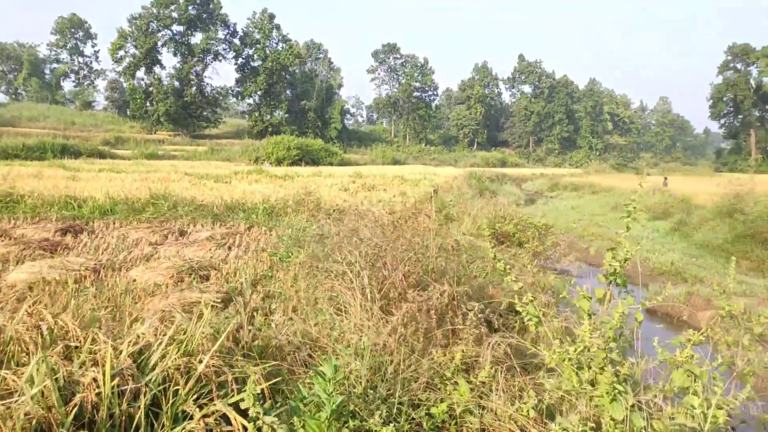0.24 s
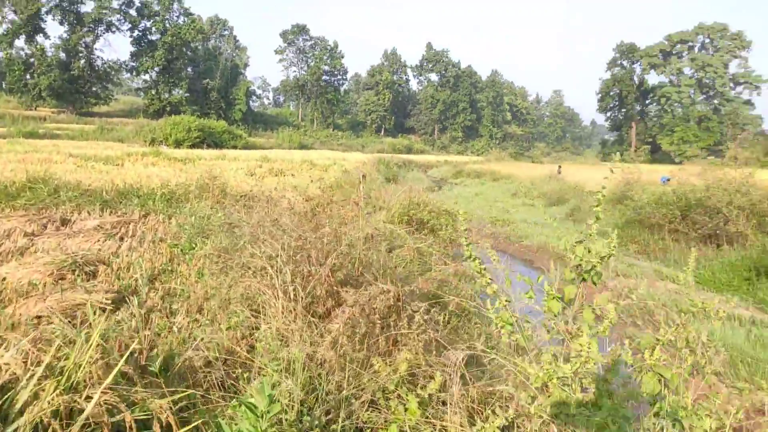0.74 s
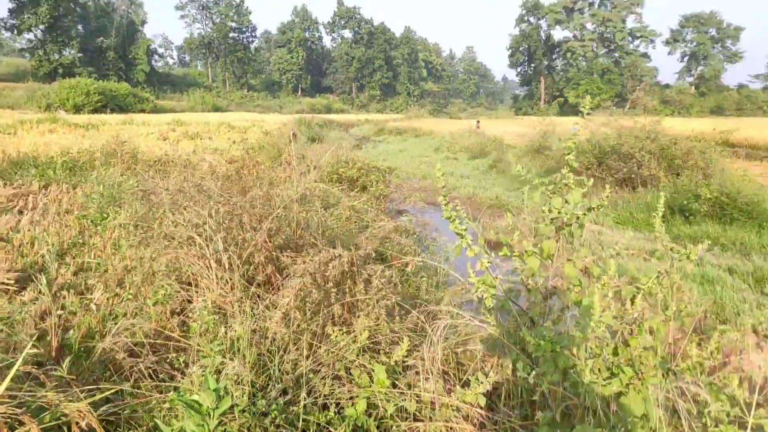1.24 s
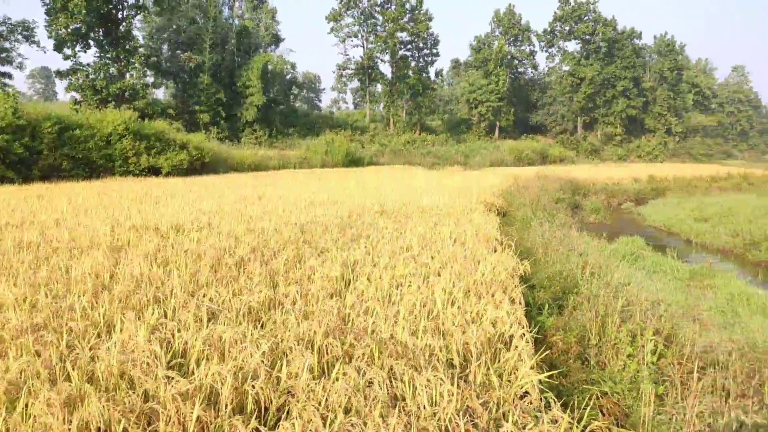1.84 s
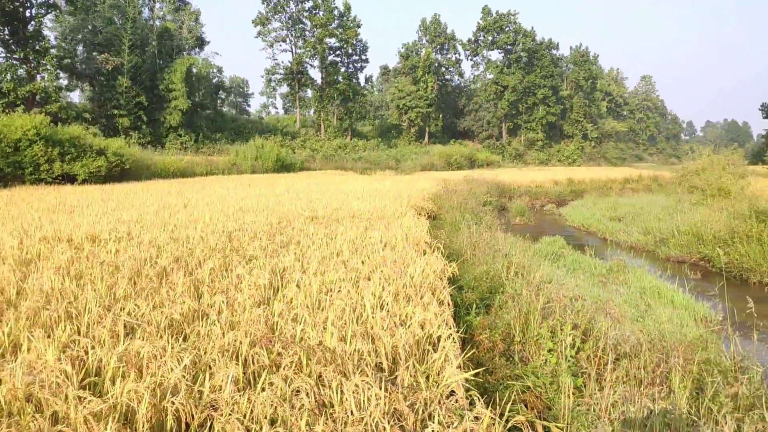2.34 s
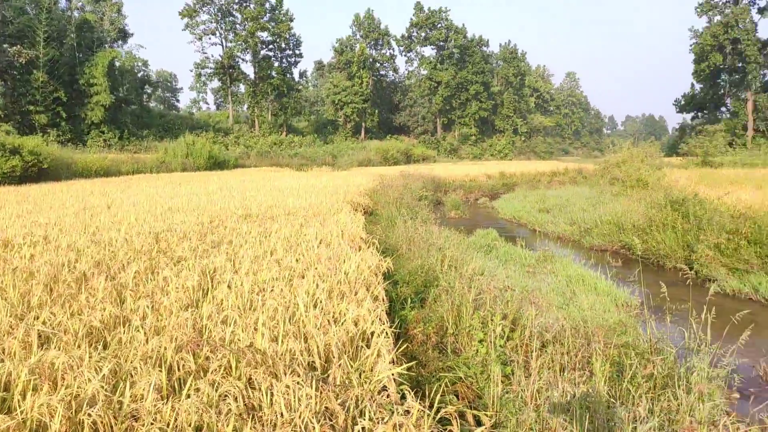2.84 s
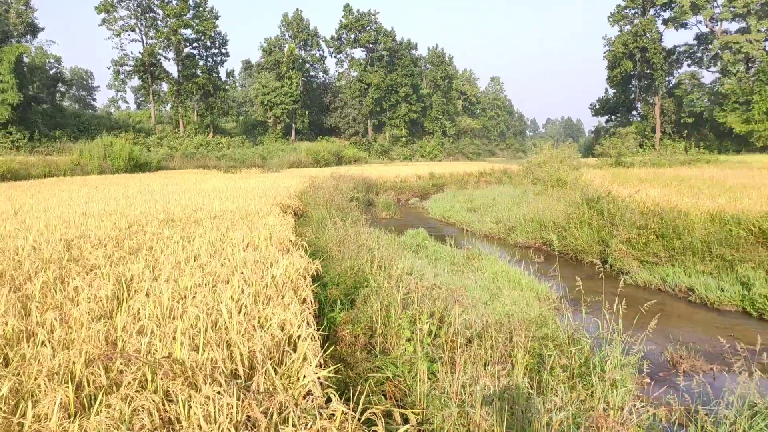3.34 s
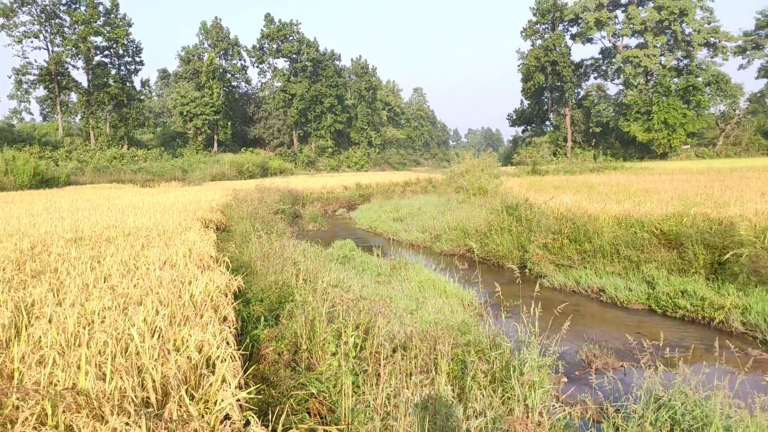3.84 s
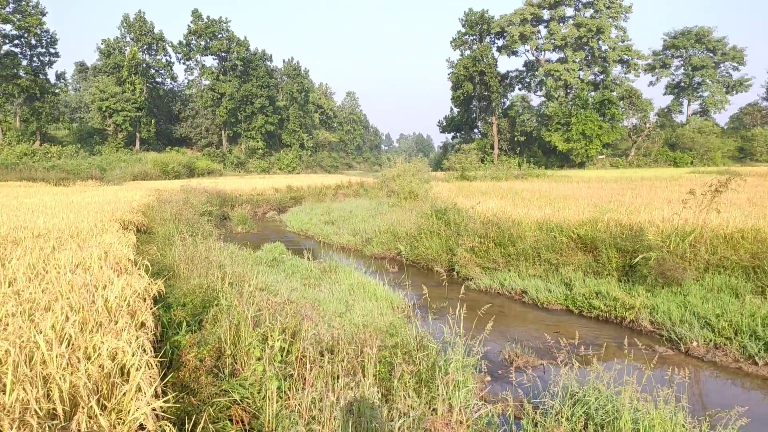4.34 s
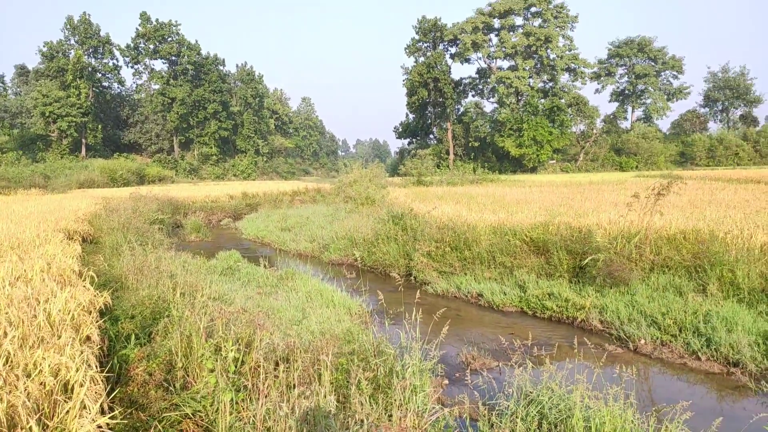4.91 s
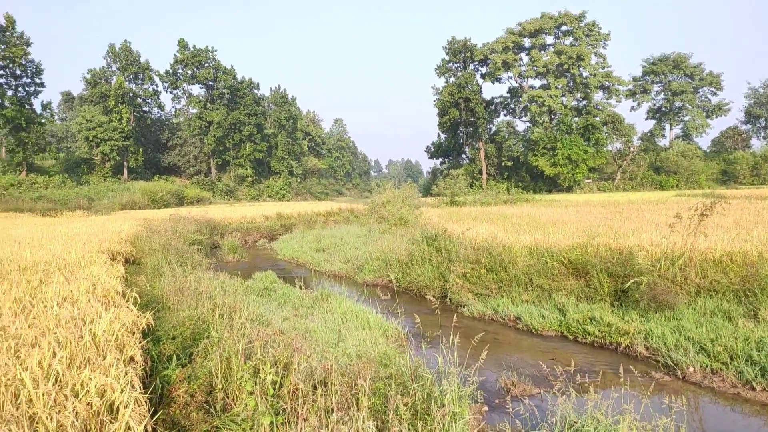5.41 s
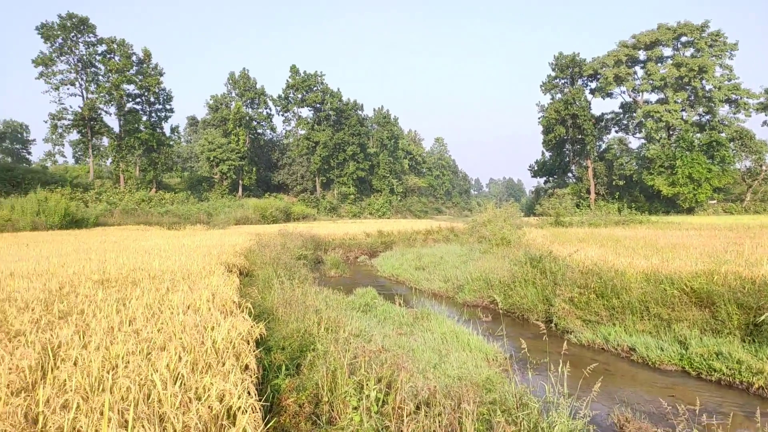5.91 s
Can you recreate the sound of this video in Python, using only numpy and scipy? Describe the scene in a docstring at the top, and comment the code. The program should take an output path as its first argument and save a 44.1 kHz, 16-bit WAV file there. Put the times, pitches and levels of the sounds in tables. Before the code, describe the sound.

From 0 to 1.4 seconds, someone wades through dry grass close to the microphone: crisp, dense rustles surge around 0.1 to 0.25 and 0.5 to 0.65, with a softer one near 1.2. Stems snap around 0.45 to 0.53; stalks knock the left side with damped thumps, thickening after 1.1 and strongest at 1.32. Fluttering insects shimmer above. At 1.4 everything cuts to silence, returning from 1.48 and full by 1.74, without wading. Quiet open air and low rumble remain under steady high insects. Birds trill in rapid short phrases from 1.7 to the end, clearest near 2.5 and 6.0, with distant ones blurred behind. Soft dove coos come at 1.75, 2.25 and 2.7. On the left, rising calls break upward at 2.3, 3.3 after a brief rasp, 4.4, 5.15 and 6.1, with whistles near 4.1 and 5.8. Tiny dry snaps dot 3.4 and 5.1 to 5.5.

```python
"""You hear someone wading through dry grass in rice fields, until all sound drops out and fades back in without the wading.
Grass is a crackle of tiny clicks; stalks knocking on the microphone are damped thumps and taps; stems snap in noise bursts.
Insects are pulsed or fluttering noise. Birds that trill, birds that call upward and a cooing dove are gliding tones,
with one pulsed noise rasp that runs into a rising call.
Below lie shaped noise for open air and rumble, and a faint wavering drone that sinks in pitch."""
import sys
import numpy as np
from scipy import signal
from scipy.fft import rfft, irfft, next_fast_len
from scipy.io import wavfile
from scipy.ndimage import map_coordinates

SR = 44100
rng = np.random.default_rng(int(sys.argv[2]) if len(sys.argv) > 2 else 0)


def unload_audio(sound):
    """Save the sound as a 16-bit wav file, at the path given as the first command line argument."""
    columns = np.transpose(np.atleast_2d(sound))
    # keep every value between -1 and 1, then stretch to whole-number steps
    steps = np.round(np.clip(columns, -1, 1) * 32767)
    wavfile.write(sys.argv[1], SR, steps.astype(np.int16))


N = 272097
TIME = np.arange(N) / SR  # seconds
CHIP_PERIOD_S = .052  # from one chip of a trill to the next

# the dropout and return of the sound: (time [s], gain)
DROPOUT = [(1.399, 1), (1.402, 0), (1.482, 0), (1.5, .11), (1.6, .45), (1.74, 1)]


def undb(db):
    """Decibels to gain."""
    return 10 ** (np.asarray(db) / 20)


def unit(x):
    """Scale to an average strength (rms) of 1."""
    return x / np.sqrt(np.mean(x ** 2) + 1e-30)


def curves(rows):
    """Join the points of each table column by straight lines in time."""
    s, *columns = np.transpose(rows)
    return [np.interp(TIME, s, c) for c in columns]


def colour(x, points):
    """Filter by a spectrum of (Hz, dB) points, falling 24 dB per octave outside them; rms 1."""
    hz, db = np.transpose(points)
    size = next_fast_len(N)
    f = np.maximum(np.fft.rfftfreq(size, 1 / SR), 1)
    below_db = 24 * np.minimum(np.log2(f / hz[0]), 0)
    above_db = 24 * np.minimum(np.log2(hz[-1] / f), 0)
    gain = undb(np.interp(np.log(f), np.log(hz), db) + below_db + above_db)
    return unit(irfft(rfft(x, size) * gain, size)[..., :N])


def resonate(x, hz, width_hz):
    """Ring at one resonance, with gain 1 at its centre."""
    centre_hz = min(hz, SR / 2 - 1000)
    sharpness = hz / min(width_hz, SR / 3)
    return signal.lfilter(*signal.iirpeak(centre_hz, sharpness, SR), x)


def walk(rate):
    """Wander smoothly at random, changing about rate times a second; spread near 1."""
    steps = np.arange(int(N / SR * rate) + 2)
    return map_coordinates(rng.standard_normal(len(steps)), [TIME * rate], mode="nearest")


def pan(db):
    """Gains of left and right for a level difference; above 0 the left is louder."""
    return undb(np.array([np.atleast_1d(db), -np.atleast_1d(db)]) / 2)


def spread(pair, likeness):
    """Blend two unrelated signals into a left and right that are partly alike."""
    c = np.clip(likeness, -1, 1)
    shared = np.sqrt(1 + c) * pair[0]
    opposed = np.sqrt(1 - c) * pair[1] * np.array([[1], [-1]])
    return (shared + opposed) / np.sqrt(2)


def noise():
    """Unrelated white noise for left and right."""
    return rng.standard_normal((2, N))


def add(track, s, sound):
    """Mix a short sound into a track at time s."""
    start = max(int(s * SR), 0)
    part = sound[:max(N - start, 0)]
    track[start:start + len(part)] += part


def swell(start, end, rise_s, fall_s):
    """An envelope that grows until start, holds until end and dies away."""
    return np.exp(np.minimum(TIME - start, 0) / rise_s - np.maximum(TIME - end, 0) / fall_s)


def together(gains):
    """Joint strength of unrelated sounds: their powers add."""
    return np.sqrt(sum(g ** 2 for g in gains))


def whistles(notes):
    """Pure tones, each gliding along its (s, Hz, dB) points."""
    out = np.zeros(N)
    for note in notes:
        s, hz, db = np.transpose(note)
        t = np.arange(s[0], max(s[-1], s[0] + .01), 1 / SR)
        # short ramps at both ends avoid clicks
        edges = np.clip(np.minimum(t - t[0], t[-1] - t) / 0.0019, 0, 1)
        phase = 2 * np.pi * np.cumsum(np.interp(t, s, hz)) / SR
        add(out, s[0], np.sqrt(2) * edges * undb(np.interp(t, s, db)) * np.sin(phase))
    return out


def placed(shape, s, pitch, db):
    """A call shape moved to its time, pitch and level."""
    return np.array(shape) * [1, pitch, 1] + [s, 0, db]


def outdoors(x, pan_db, near_db, far_db, t60, lag_s=0):
    """Direct sound (left lag_s later), quick scatter from the crop, and a thin tail from the tree line."""
    t = np.arange(SR) / SR
    near = rng.standard_normal((2, SR)) * undb(-60 * t / .04)
    far = rng.standard_normal((2, SR)) * undb(-60 * t / t60) * np.clip(t / 0.022, 0, 1)
    response = (undb(near_db) * unit(near) + undb(far_db) * unit(far)) / np.sqrt(SR)
    direct = np.array([np.interp(TIME - lag_s, TIME, x), x])
    echoes = signal.fftconvolve(x[None], response, axes=1)[:, :N]
    total = np.sqrt(1 + undb(near_db) ** 2 + undb(far_db) ** 2)
    return pan(pan_db) * (direct + echoes) / total


def crackle(rate, scatter_db):
    """Countless tiny clicks of uneven size, left and right; rate is clicks per second."""
    sizes = undb(scatter_db * np.minimum(rng.exponential(size=(2, N)), 6))
    return unit(noise() * sizes * (rng.random((2, N)) < rate / SR))


def grass():
    """Each push makes dry blades scrape past each other in a dense hiss; thicker stems crunch lower down."""
    # spectra of the two layers: (frequency [Hz], level [dB per Hz])
    hiss_spectrum = [(2500, -16), (4500, -10), (6500, -12.5), (8800, -4.5), (10300, -3), (12500, -5),
                     (15500, -7.5)]
    crunch_spectrum = [(60, 11), (200, -6), (450, -4), (900, -3.5), (1800, -2.5), (3200, -1), (4500, -2),
                       (7000, -4), (12000, -26)]
    # pushes through the grass: surges of rustle, some made of two overlapping parts:
    # (push start [s], push end [s], hiss level [dB], crunch level [dB], settling time [s])
    pushes = [(0.106, 0.202, -36, -53, 0.2), (0.517, .53, -36.5, -53, 0.027),
              (0.538, 0.63, -42.5, -61, .14), (1.179, 1.2, -43.5, -58, 0.27),
              (1.31, 1.33, -53, -52.5, 0.12)]
    # blades keep brushing the legs between pushes
    hisses, crunches = [undb(-53)], [undb(-58)]
    for start, end, hiss_db, crunch_db, settle_s in pushes:
        push = swell(start, end, rise_s=0.13, fall_s=settle_s)
        hisses.append(undb(hiss_db) * push)
        crunches.append(undb(crunch_db) * push)
    hiss = colour(spread(crackle(rate=14000, scatter_db=-1.0), likeness=0.03), hiss_spectrum)
    hiss = hiss * together(hisses) * undb(1.2 * walk(50))
    crunch = colour(spread(crackle(rate=5000, scatter_db=0.5), likeness=0.75), crunch_spectrum)
    crunch = crunch * together(crunches) * undb(2.0 * walk(59.57))
    before_return = TIME < DROPOUT[2][0]
    return (hiss * pan(3.5) + crunch * pan(.5)) * before_return


def knocks(tap_hz=480):
    """Each stalk taps the left port and pushes a short, heavily damped thump into it."""
    # knocks: (time [s], thump level [dB], thump pitch [Hz], tap level [dB] before a gain of 1.55)
    knock_rows = [(0.275, -35.5, 280, -58), (.751, -42, 380, -40), (.845, -38.5, 226, -31.5),
                  (.918, -69, 257, -36), (1.115, -32, 205, -40), (1.185, -31, 172, -37.5),
                  (1.241, -25.5, 170, -37), (1.261, -26.5, 157, -54), (1.3179, -15, 101, -15),
                  (1.3535, -31, 172, -23.5), (1.3563, -32, 129.5, -26.5)]
    out, t = np.zeros(N), np.arange(SR // 20) / SR
    for s, thump_db, hz, tap_db in knock_rows:
        thump = -np.sin(2 * np.pi * hz * t) * np.exp(-t * hz / 0.4)
        tap = np.cos(2 * np.pi * tap_hz * t) * np.exp(-t / 0.0006) * (1 - np.exp(-t / 0.00014))
        add(out, s, undb(thump_db) * thump + 1.55 * undb(tap_db) * tap)
    return out * undb([[0], [-27]])  # much weaker on the right


def snaps():
    """Single dry stems crack with a brief broad ring."""
    # cracks: (time [s], level [dB], centre [Hz], decay [s])
    snap_rows = [(.444, -38, 11100, .003), (0.495, -35, 9000, 0.0027), (.515, -37, 9100, 0.005),
                 (.528, -38, 4000, 0.0018), (.92, -53, 1050, .005), (3.422, -57, 11000, .003),
                 (3.447, -54, 1330, 0.004), (3.448, -47, 3900, 0.0025), (3.486, -48, 5470, 0.0012),
                 (5.130, -53, 13000, 0.002), (5.362, -52, 11000, .002), (5.362, -53, 4800, 0.0032),
                 (5.493, -55, 11500, 0.0012)]
    out, t = np.zeros(N), np.arange(SR // 20) / SR
    for s, db, hz, decay in snap_rows:
        crack = resonate(resonate(rng.standard_normal(len(t)), hz, 0.63 * hz), hz, 0.63 * hz)
        add(out, s, undb(db) * unit(crack) * np.exp(-t / decay))
    return outdoors(out, pan_db=12.5, near_db=-25.0, far_db=-5, t60=0.15)


def ticker(rate, hz, width_hz):
    """An insect whose wing strokes each scrape a short burst out of one resonance."""
    phase = np.cumsum(rate * (1 + .012 * walk(5.4))) / SR % 1
    stroke = np.exp(-((phase - .5) / .18) ** 2) * undb(1.5 * walk(40))
    scrape = spread(noise(), likeness=0.18) * stroke
    return unit(resonate(resonate(scrape, hz, width_hz), hz, width_hz))


def insects():
    """Near tickers beat against each other in pairs over two far choirs that blur into a shimmer."""
    # near tickers: (start [s], end [s], strokes [per s], centre [Hz], width [Hz], level [dB])
    tick_bouts = [(0, 1.45, 58, 5930, 890, -58.5), (0, .9, 83, 5680, 510, -60.5),
                  (3.2, 6.17, 64.3, 5950, 870, -63), (5.05, 6.17, 71, 5730, 510, -66.5)]
    # spectra of the two far choirs: (frequency [Hz], level [dB per Hz])
    low_spectrum = [(4700, -25), (5200, -11), (5500, -3), (5750, 2), (6050, -7.5), (6400, -7.5),
                    (7000, -25.5)]
    high_spectrum = [(6000, -24), (6900, -11.5), (7450, -1), (8400, 1), (8900, -1), (9500, -9.5),
                     (10300, -16.5), (12000, -27.5)]
    near = 0
    for start, end, rate, hz, width_hz, db in tick_bouts:
        bout = undb(db) * swell(start, end, rise_s=0.35, fall_s=0.23)
        near = near + bout * ticker(rate, hz, width_hz)
    low = colour(noise(), low_spectrum) * undb(-58.5 + .5 * walk(5.8))
    flutter = 1 + 0.1 * np.sin(2 * np.pi * np.cumsum(110 + 5 * walk(1)) / SR)
    high = colour(spread(noise(), likeness=0.024), high_spectrum) * undb(-55.5 + .5 * walk(17)) * flutter
    return near * pan(2.33) + low * pan(7.2) + high * pan(3.5)


def chips(rows, sweep_hz_per_s):
    """Chips (middle s, Hz, dB, half length s) that swell while falling ever faster; short ones cover less pitch."""
    # (time in half lengths, pitch in sweeps per half length, dB)
    shape = np.array([(-1, .75, -13), (-.33, .35, -3), (.33, -.35, 0), (.85, -1.05, -12)])
    return whistles(shape * [half_s, half_s * sweep_hz_per_s, 1] + [s, hz, db] for s, hz, db, half_s in rows)


def phrase(first, last, hz, db, first_db, half_s):
    """Evenly spaced chips that settle to full voice while their pitch sags a little."""
    count = round((last - first) / CHIP_PERIOD_S) + 1
    k, chance = np.arange(count), rng.standard_normal((count, 2))
    # the pitch sags 19 Hz per chip, and no two chips are quite alike
    pitch = hz - 19 * (k - k.mean()) + 25.2 * chance[:, 0]
    level = db + first_db * np.exp(-k / .7) - 0.1 * chance[:, 1]
    return np.transpose([np.linspace(first, last, count), pitch, level, np.full(count, half_s)])


def trilling_birds():
    """Birds a little to the right sing short phrases of falling tones, about nineteen chips a second."""
    # phrases: (first chip [s], last chip [s], pitch [Hz], level [dB], extra level of the first chip [dB],
    # half length of a chip [s])
    trills = [(1.699, 1.945, 4400, -52, -13, .021), (2.002, 2.159, 4070, -52.5, -2, .01),
              (2.022, 2.127, 4010, -57, -2, .01), (2.344, 2.449, 4390, -58, -1, .016),
              (2.478, 2.68, 4173, -46, -7, 0.014), (2.757, 2.954, 4500, -55, -7, .014),
              (2.978, 3.034, 4260, -61, -3, .018), (3.25, 3.453, 4340, -52, -2.5, 0.016),
              (3.64, 3.847, 4170, -61, -10, .018), (3.973, 4.175, 4140, -51.5, -7, .019),
              (4.301, 4.457, 4290, -57.5, -6, 0.015), (4.508, 4.661, 4310, -54.5, -3, .019),
              (4.844, 5.068, 4460, -62.5, -3, 0.02), (5.27, 5.368, 4560, -54.5, -7, 0.017),
              (5.434, 5.596, 4060, -56.5, 1, .018), (5.993, 6.138, 4186, -47.5, -7, 0.016)]
    song = chips(np.vstack([phrase(*row) for row in trills]), sweep_hz_per_s=24600)
    return outdoors(song, pan_db=-2.0, near_db=-5.0, far_db=-8.5, t60=0.31)


def far_birds(far_hz=4280, half_s=0.02):
    """More birds of the trilling kind blur together far off, as scattered chips that grow louder in bouts."""
    # louder bouts: (start [s], end [s], level [dB])
    far_bouts = [(2.804, 2.97, -63), (3.35, 3.75, -64), (4.376, 4.522, -59), (5.147, 5.45, -60.5),
                 (5.88, 6.17, -60)]
    count = int(N / SR / CHIP_PERIOD_S)
    chance = rng.standard_normal((count, 3))
    s = np.arange(count) * CHIP_PERIOD_S + .008 * chance[:, 0]
    rows = np.transpose([s, far_hz + 160 * chance[:, 1], 3 * chance[:, 2], np.full(count, half_s)])
    gains = [undb(-71.5)]  # the lulls between bouts
    gains += [undb(db) * swell(start, end, rise_s=0.11, fall_s=0.038) for start, end, db in far_bouts]
    song = unit(chips(rows, sweep_hz_per_s=24040)) * together(gains)
    return outdoors(song, pan_db=-0.5, near_db=7.5, far_db=10.0, t60=0.32)


def glide(s, length_s, start_hz, end_hz, bend, db, loudest):
    """(s, Hz, dB) points of a whistle that bends from one pitch to another, swelling and fading once."""
    share, edge_db = np.linspace(0, 1, 20), -11.5
    fade_db = np.interp(share, [0, np.clip(loudest, .05, .95), 1], [edge_db, 0, edge_db])
    hz = start_hz + (end_hz - start_hz) * share ** bend
    return np.transpose([s + share * length_s, hz, db + fade_db])


def bird_rasp():
    """Each pulse lets a short puff of noise through a throat that opens wide and narrows to one resonance."""
    # the rasp: (time [s], pulses [per s], level [dB] before a 3 dB cut, open throat against narrow [dB])
    rasp_points = [(3.208, 560, -77, -9), (3.219, 420, -52, 11.5), (3.229, 330, -59.5, 8),
                   (3.245, 280, -62, 5), (3.265, 270, -53.5, -7), (3.295, 320, -61.5, -18),
                   (3.322, 260, -65, -16)]
    # spectrum of the open throat: (frequency [Hz], level [dB per Hz])
    open_throat = [(700, -9), (1400, 2), (2400, -7), (3600, 7.5), (4100, -2), (5000, -24)]
    rate, db, open_db = curves(rasp_points)
    phase = np.cumsum(rate * (1 + 0.045 * walk(200))) / SR % 1
    puffs = np.exp(-phase / 0.71) * rng.standard_normal(N)
    narrow = unit(resonate(resonate(puffs, 1900, 1300), 1940, 1300))
    sounding = (TIME > rasp_points[0][0]) * (TIME < rasp_points[-1][0])
    return (narrow + undb(open_db) * colour(puffs, open_throat)) * undb(db - 3) * sounding


def calling_bird():
    """Two-voiced rising calls, loose whistles and one pulsed rasp that runs into a call, on the left."""
    # a call whose voice breaks upward, and its second, higher voice:
    # (time from the break [s], pitch [Hz], relative level [dB])
    low_voice = [(-.06, 1704, -27), (-.035, 1950, -12), (-.002, 2257, -4.5), (.003, 2923, -2),
                 (.014, 3255, 0), (.025, 3655, 1), (.034, 4550, -4.5), (.048, 4830, -8.5), (.074, 4780, -8)]
    high_voice = [(-.06, 3150, -20), (-.047, 3600, -9), (-.025, 3950, -8), (.0, 4400, -14)]
    # calls: (time of the break [s], pitch factor, relative level [dB], second voice against it [dB])
    rising_calls = [(2.308, 1.08, -49.5, -22), (3.301, 1.05, -49, -1), (4.425, 0.98, -53.5, 5),
                    (5.161, .96, -54.5, 4), (6.103, 0.95, -52.5, 5)]
    # whistles: (start [s], length [s], start pitch [Hz], end pitch [Hz], bend [above 1 the glide comes late],
    # relative level [dB], loudest point [share of the length])
    loose_whistles = [(2.244, 0.053, 1960, 4830, 0.49, -57, 0.69), (3.772, .06, 1700, 2750, 1.4, -72, .7),
                      (4.073, 0.07, 3150, 2400, 1.5, -48.5, .7),
                      (4.127, 0.062, 3900, 3000, 0.91, -57, 0.32),
                      (4.123, 0.053, 2200, 1830, 0.65, -65, .5), (5.03, .035, 2630, 2300, 1.1, -64, .4),
                      (5.355, 0.043, 2650, 3050, 1, -62.5, .5), (5.367, 0.043, 3360, 4230, 1.27, -53, .6),
                      (5.76, .06, 3120, 5200, 0.82, -50.5, 0.47), (5.764, 0.081, 1704, 2870, .9, -59.5, 1),
                      (5.836, .042, 3100, 4080, 1.25, -47, .45)]
    notes = [placed(low_voice, s, pitch, db) for s, pitch, db, _ in rising_calls]
    notes += [placed(high_voice, s, pitch, db + second_db) for s, pitch, db, second_db in rising_calls]
    notes += [glide(*row) for row in loose_whistles]
    song = whistles(notes) * undb(3.0 * walk(260))  # a quick unsteadiness in loudness
    whistled = outdoors(song * undb(-1.5), pan_db=5.5, near_db=0, far_db=-5.5, t60=.45)
    return whistled + outdoors(bird_rasp(), pan_db=9.5, near_db=-7, far_db=-21, t60=0.63)


def dove():
    """Soft, pure coos that dip and lift, off to the right: three clear ones and a faint late one."""
    # the shape of one coo: (time from its start [s], pitch [Hz], relative level [dB])
    coo_shape = [(0, 456, -12), (.016, 548, -6.5), (.032, 512, 2), (.05, 438.4, 0.5), (.075, 441, 0.5),
                 (.11, 455, 2), (.13, 482, 0), (.15, 464, -15)]
    # coos: (start [s], pitch factor, level [dB])
    coo_rows = [(1.756, 1.003, -53.5), (2.235, 0.97, -54), (2.671, .935, -55), (4.93, 1.08, -77)]
    song = whistles(placed(coo_shape, *coo) for coo in coo_rows)
    return outdoors(song, pan_db=-2.0, near_db=-35, far_db=-13.5, t60=1.1, lag_s=0.00033)


def far_drone():
    """A faint tone comes and goes, sinking in pitch, its strength and phase wavering at random."""
    # times when it is heard: (start [s], end [s], level [dB])
    drone_bouts = [(2.849, 3.15, -79.5), (4.4, 4.705, -80), (5.35, 5.7, -78.5)]
    start_hz, end_hz, sink_s = 810, 635, 1.0
    hz = end_hz + (start_hz - end_hz) * np.exp(-np.maximum(TIME - drone_bouts[0][0], 0) / sink_s)
    phase = 2 * np.pi * np.cumsum(hz) / SR
    strength = together(undb(db) * swell(start, end, rise_s=.1, fall_s=0.45) for start, end, db in drone_bouts)
    return strength * (walk(110) * np.sin(phase) + walk(110) * np.cos(phase))


def background():
    """Thin open-air hiss and a low rumble nearly alike on both sides, both shaped noise, with the far drone."""
    # spectra of the open air and the rumble: (frequency [Hz], level [dB per Hz])
    air_spectrum = [(130, -2.5), (280, 4.5), (430, 6), (650, 3), (950, -4), (1500, -5.5), (2500, -0.5),
                    (4000, 1.5), (7000, -2), (11000, -4.5), (13500, -6.5), (15500, -7.5)]
    rumble_spectrum = [(8.8, -31.5), (15, 6), (27, -9.5), (48, -6.5), (70, -6.5), (87, -11), (102, -19.5),
                       (124, -16.5), (141, -27.5), (161, -26.5), (260, -36), (340, -61), (570, -120)]
    air = colour(spread(noise(), likeness=0.1), air_spectrum) * undb(-65.5 + 0.28 * walk(3.6))
    rumble = colour(spread(noise(), likeness=0.86), rumble_spectrum) * undb(-56.5 + 0.83 * walk(2.9))
    return air + rumble + far_drone()


def scene():
    """Everything in the fields."""
    walker = grass() + knocks() + snaps()
    animals = insects() + trilling_birds() + far_birds() + calling_bird() + dove()
    return walker + animals + background()


def record(dry):
    """The sound drops out and fades back in, and a steep filter removes the highest treble."""
    gain, = curves(DROPOUT)
    top_cut = signal.ellip(12, .1, 80, 15600, fs=SR, output="sos")  # cut above 15600 Hz
    return signal.sosfilt(top_cut, dry * gain)


dry = scene()
out = record(dry)
unload_audio(out)
```